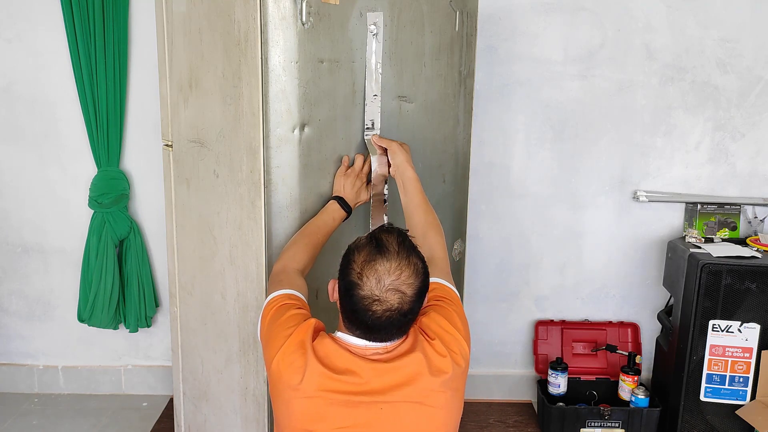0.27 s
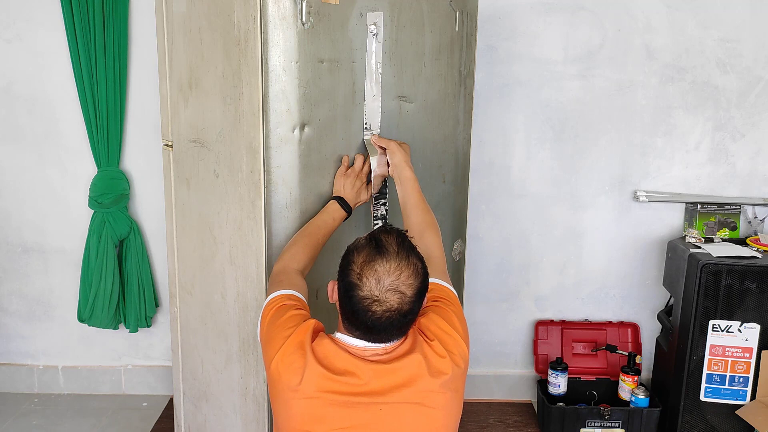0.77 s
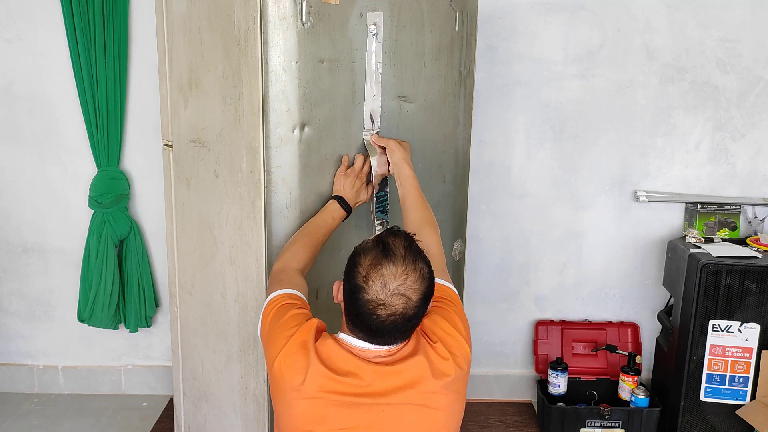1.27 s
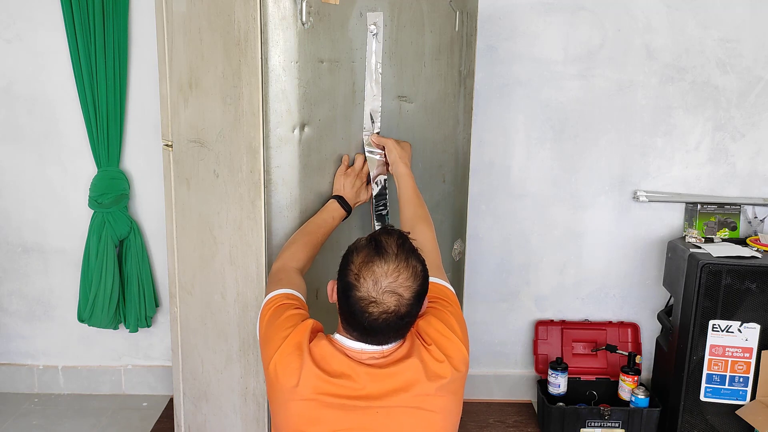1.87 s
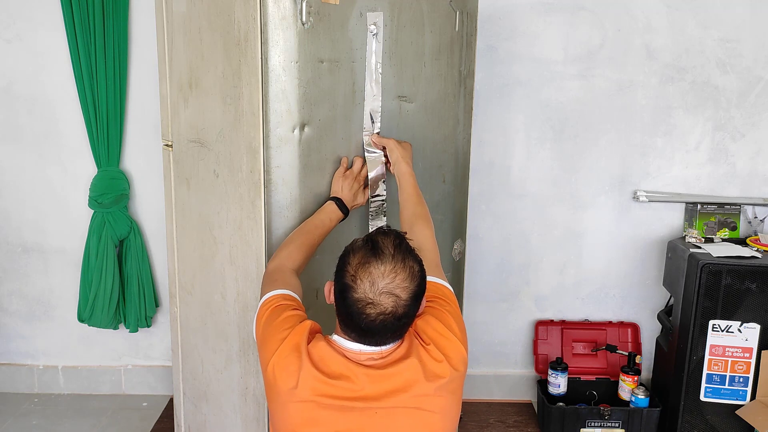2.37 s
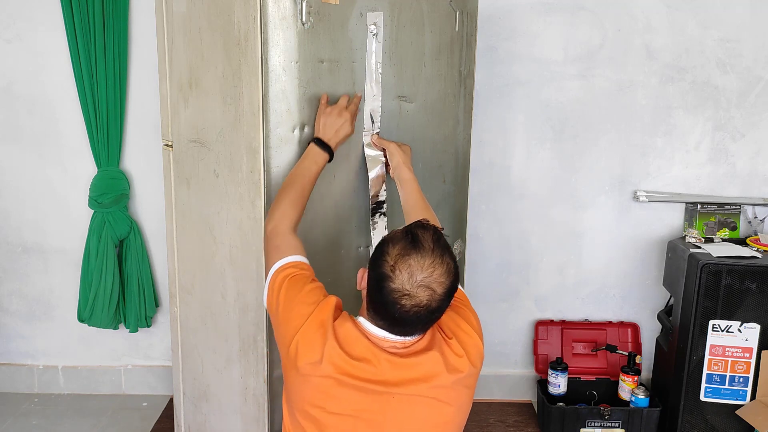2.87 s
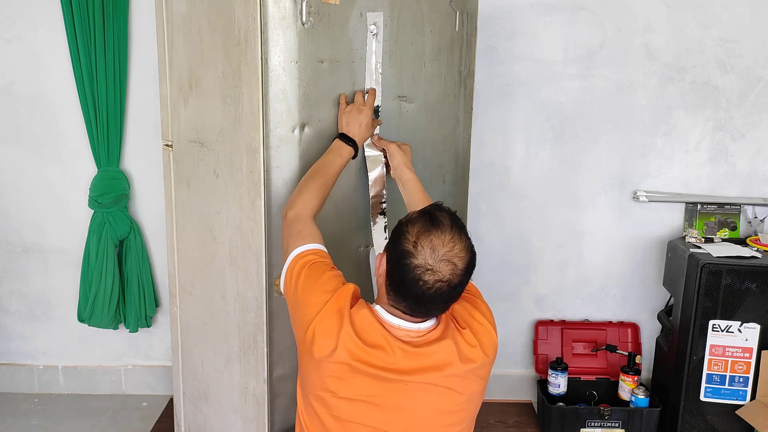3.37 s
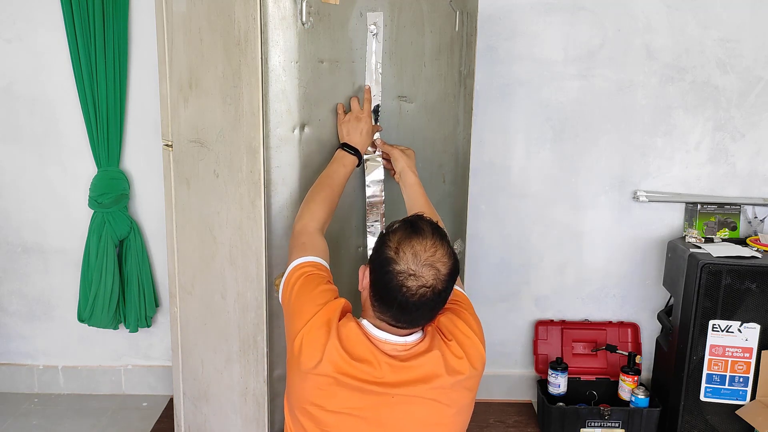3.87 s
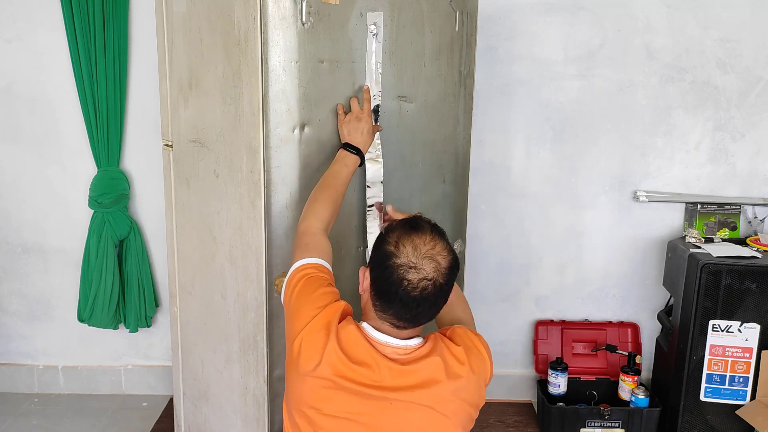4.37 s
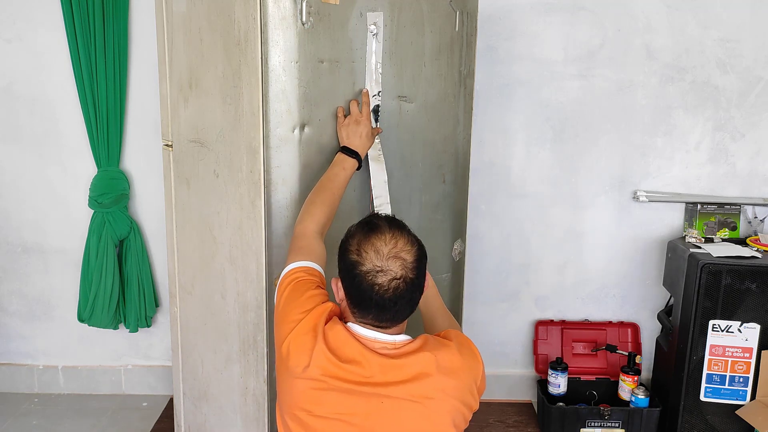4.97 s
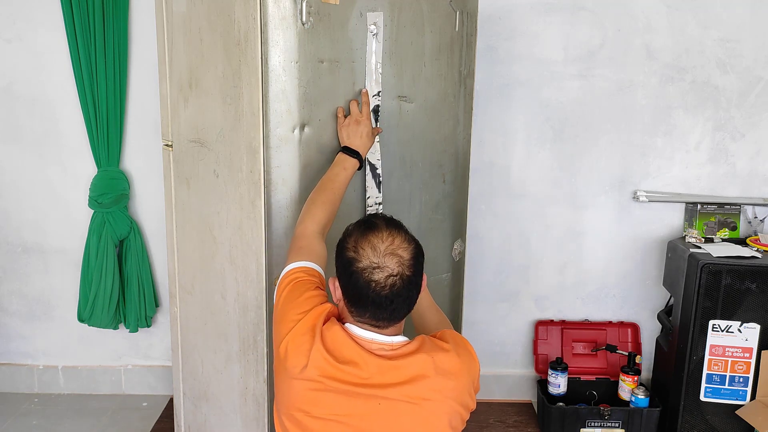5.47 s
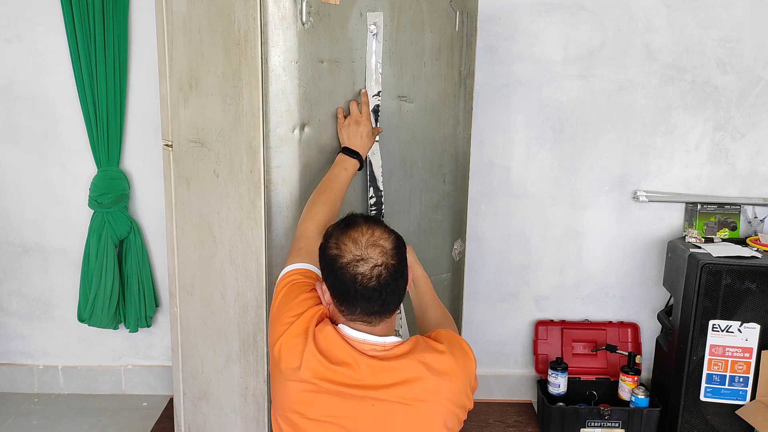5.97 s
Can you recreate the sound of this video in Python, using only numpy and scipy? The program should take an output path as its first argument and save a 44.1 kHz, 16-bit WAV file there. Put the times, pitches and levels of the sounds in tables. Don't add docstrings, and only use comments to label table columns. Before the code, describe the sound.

In a bare, hard-walled room, a hand presses foil tape onto a hollow metal panel a few metres from the microphone. Crisp single snaps come in loose clusters, some with dull panel knocks, and one push makes the metal boom softly. The strongest cracks come just after four seconds, then tugs on the loose strip rustle quietly. A low engine hum from outside swells and fades beneath faint room air.

```python
import sys
import numpy as np
from scipy import signal
from scipy.fft import rfft, irfft
from scipy.io import wavfile
from scipy.ndimage import uniform_filter1d

SR = 44100
rng = np.random.default_rng(int(sys.argv[2]) if len(sys.argv) > 2 else 0)


def to_wav(s):
    ch = np.atleast_2d(s).T
    pcm = np.round(np.clip(ch, -1, 1) * 32767)
    wavfile.write(sys.argv[1], SR, pcm.astype(np.int16))


def invert_db(x):
    u = np.asarray(x, float) / 20
    return 10 ** u


N = 274302

# start_s, level_db, pitch_hz, rustle_s
TUGS = [(4.788, -53, 1960, 0.082), (4.942, -52.5, 2900, 0.066), (4.963, -48, 2100, 0.065),
        (5.0616, -45, 2470, 0.13), (5.064, -60, 4130, 0.049), (5.072, -47.5, 1540, 0.048),
        (5.3451, -45.5, 1540, 0.17), (5.348, -52.5, 3540, 0.043), (5.412, -54, 3000, 0.035),
        (5.405, -50, 1560, 0.037), (5.599, -49, 2800, 0.067), (5.667, -42, 2070, 0.06),
        (5.669, -47, 4060, 0.047), (5.793, -43.5, 1930, 0.065), (5.8244, -47, 1380, 0.13),
        (5.826, -49, 3500, 0.046), (5.798, -51.5, 3370, 0.043), (6.002, -47.5, 1520, 0.09),
        (6.035, -49, 3616, 0.074)]


def evened(x):
    return x / np.sqrt(np.mean(x ** 2) + 1e-20)


def read(points, hz):
    f, value = np.transpose(points)
    return np.interp(np.log(hz + 1), np.log(f + 1), value)


def add(mix, start_s, sound):
    part = mix[round(start_s * SR):][:len(sound)]
    part += sound[:len(part)]


def click(points, tilt_db=0, size=1024):
    hz = abs(np.fft.fftfreq(size, 1 / SR))
    octaves = np.log2(np.clip(hz / 1500, 1, 4.6))
    log_gain = np.log(invert_db(read(points, hz) + tilt_db * octaves))
    pulse = np.fft.ifft(np.exp(np.conj(signal.hilbert(log_gain)))).real[:size // 2]
    return pulse / np.linalg.norm(pulse)


def ring(modes, seconds):
    t = np.arange(round(seconds * SR)) / SR
    return sum(invert_db(db - 60 * t / t60_s) * np.sin(2 * np.pi * hz * t) for hz, db, t60_s in modes)


def drift(hz):
    lowpass = 1 + (np.fft.rfftfreq(N, 1 / SR) / hz) ** 4
    return evened(irfft(rfft(rng.standard_normal(N)) / lowpass, N))


def room_tone():
    # hz, level_db
    air = [(12, -62), (20, 0), (84, -11), (147, -15.5), (263, -17), (387, -21.5), (484, -21), (774, -26),
           (841, -28), (1020, -25), (6010, -38.5), (9370, -45.5), (11700, -41.5), (13800, -40),
           (15000, -56)]
    air_db = -58
    # hz, width_hz, level_db
    murmurs = [(37, 3.4, -73), (173, 12, -77), (249, 50, -68.5), (294, 27, -95), (467, 61, -83),
               (852, 12.7, -77)]
    # hz, correlation
    likeness = [(60, 0.063), (180, 0.71), (550, 0.25), (1650, -0.26), (4970, 0.082), (15000, -0.064)]
    # time_s, level_db
    street = [(0, 4), (.8, 2), (1.4, 1), (2.4, 6), (2.8, 3.5), (3.3, 2), (3.9, 5.5), (4.6, 2.5), (5.4, 3.5),
              (6.22, 2)]
    frames, hz = N // 1024 + 10, np.fft.rfftfreq(4096, 1 / SR)
    a, b, c, d, patches = rng.standard_normal((frames, len(hz), 5)).T
    patches = uniform_filter1d(patches, size=40, axis=0)
    patches = evened(uniform_filter1d(patches, size=6, axis=1))
    swell_db = np.interp((np.arange(frames) - 4) * 1024 / SR, *np.transpose(street))
    same = np.clip(read(likeness, hz), -1, 1)[:, None]
    left = a + 1j * b
    right = same * left + np.sqrt(1 - same ** 2) * (c + 1j * d)
    wide = invert_db(read(air, hz))
    wide *= invert_db(air_db) / np.linalg.norm(wide)
    bands = sum(invert_db(db) / np.sqrt(w) / (1 + ((hz - f) / w * 2) ** 2) for f, w, db in murmurs)
    z = np.array([left, right]) * np.hypot(wide, 3 * bands)[:, None] * invert_db(1.1 * patches + swell_db)
    return signal.istft(z, nperseg=4096, noverlap=3072)[1][:, 4096:N + 4096]


def buffet():
    return invert_db(-53.0) * np.array([drift(18) for port in range(2)])


def tone(hz, level, waver_rad):
    phase = 2 * np.pi * np.cumsum(hz * np.ones(N)) / SR
    return np.sqrt(2) * level * np.sin(phase + waver_rad * drift(8.7))


def far_engine():
    # start_s, length_s, pitch_hz, level_db
    notes_heard = [
        (0.545, 0.4, 101.5, -68),
        (0.912, 0.68, 101.5, -62.5),
        (1.493, 1.7, 108.3, -65.5),
        (2.757, 0.68, 100.5, -63.5),
    ]
    t = np.arange(N) / SR
    out = np.zeros(N)
    for start_s, length_s, hz, db in notes_heard:
        arch = np.sin(np.pi * np.clip((t - start_s) / length_s, 0, 1)) ** 0.31
        out += tone(hz, invert_db(db) * arch, .95)
    return out


def hum():
    # time_s, level_db
    swell = [(0.0, -66), (0.1, -58), (1.52, -55), (1.61, -53), (1.82, -68), (1.87, -52), (2.16, -56.5),
             (2.23, -65), (2.48, -54.5), (2.86, -51), (3.01, -66.5), (3.22, -49.5), (3.72, -48.5),
             (4.9, -61), (5.54, -60), (5.65, -75), (5.75, -64.5), (6.22, -60)]
    from_hz, to_hz, climb_s, climb_time_s = 65.2, 71.5, 1.7, 0.29
    throb_hz, throb_top_s, throb_db, waver_db = 3.05, 1.283, 2.5, 1.94
    t = np.arange(N) / SR
    climbed = 1 / (1 + np.exp((climb_s - t) / climb_time_s))
    throb = throb_db * (1 - climbed) * np.cos(2 * np.pi * throb_hz * (t - throb_top_s))
    level = invert_db(np.interp(t, *np.transpose(swell)) + throb + waver_db * drift(2.3))
    return tone(from_hz + (to_hz - from_hz) * climbed, level, 0.37)


def room(wet_db, gap_s, build_s):
    # time_s, level_db
    echoes = [(.0024, -9), (.0046, -9), (.012, -7), (.0135, -10), (.0175, -9), (.021, -10), (.028, -9)]
    # hz, t60_s
    reverb = [(150, 0.51), (400, 1), (1000, 0.88), (2500, 0.88), (5000, 0.87), (8000, 0.66), (13000, 0.21)]
    s = np.arange(SR) / SR
    density = np.clip((s / .09) ** 2, .03, 1)
    taps = rng.standard_normal((2, SR)) * (rng.random((2, SR)) < density) / np.sqrt(density)
    hz, t, z = signal.stft(taps, SR, nperseg=256)
    t60_s = read(reverb, hz)[:, None]
    tail = signal.istft(z * invert_db(-60 * t / t60_s) / np.sqrt(t60_s), SR, nperseg=256)[1][:, :SR]
    tail = tail * (.5 + .5 / (1 + np.exp((gap_s - s) / build_s)))
    low = signal.sosfiltfilt(signal.butter(1, 700, fs=SR, output="sos"), tail)
    tail = invert_db(wet_db) * (tail - low + low[0]) / np.linalg.norm(tail[0])
    early = np.zeros((2, SR))
    early[:, 0] = 1
    for echo_s, db in echoes:
        early[[0, 1], round(echo_s * SR) + rng.integers(-12, 12, 2)] += invert_db(db) * rng.choice([-1, 1])
    return tail + signal.sosfilt(signal.butter(1, 900, "high", fs=SR, output="sos"), early)


def boom():
    # hz, level_db, t60_s
    modes = [(36.1, 1.5, 3.7), (95.4, -6, 2), (120.5, -8.5, 1.8), (138.6, -10, 1.4), (186, -17.5, 4.1),
             (192.6, -2, 0.23), (266, -15, 0.9), (318.4, -19, 1.5)]
    start_s, level_db, rise_s, stop_s, stop_time_s = 3.49, -41.5, 0.014, 0.55, 0.04
    sound, out = ring(modes, 1.2), np.zeros(N)
    t = np.arange(len(sound)) / SR
    shape = (1 - np.exp(-t / rise_s)) / (1 + np.exp((t - stop_s) / stop_time_s))
    add(out, start_s, invert_db(level_db) * sound * shape)
    return out


def knocks():
    # start_s, thud_db, upper_db
    pushes = [
        (.033, -69, -41),
        (1.53, -55, -68),
        (1.77, -31, -42),
        (1.963, -57, -39),
        (2.183, -38.5, -40.5),
        (3.497, -37.5, -35),
        (4.118, -33.5, -31),
        (4.191, -39.5, -42),
        (4.24, -43, -36.5),
    ]
    # hz, level_db, t60_s
    thud_modes = [(180, 0, .25), (232, 0, .25), (250, -3, .2), (272, -2, .2)]
    # hz, level_db, t60_s
    upper_modes = [(474, -3, 0.063), (400.7, -15, 0.14), (539, -14.5, 0.095), (683, -14.5, 0.11),
                   (802, -5.5, 0.027)]
    out, thud, upper = np.zeros(N), ring(thud_modes, .3), ring(upper_modes, .3)
    thud /= np.linalg.norm(thud)
    upper /= np.linalg.norm(upper)
    pad = 1 - np.exp(-np.arange(len(thud)) / SR / 0.0036)
    for start_s, thud_db, upper_db in pushes:
        add(out, start_s, pad * (invert_db(thud_db) * thud + invert_db(upper_db) * upper))
    return out


def rustle():
    # hz, level_db
    colour = [(180, -37), (300, 4.5), (427, 1.5), (527, 6.5), (910, 1), (2100, -1.5), (3930, -11),
              (8920, -52), (14000, -47)]
    level_db, fade_db, rise_s, grains_per_s = -14.5, -11, 0.0059, 110
    sizes = invert_db(4.6 * np.minimum(rng.exponential(1, N), 4))
    grains = sizes * (rng.random(N) < grains_per_s / SR) * rng.choice([-1, 1], N)
    level, t = np.zeros(N), np.arange(SR) / SR
    for start_s, db, _, length_s in TUGS:
        fade = invert_db(db + level_db + fade_db * t / max(length_s, .02))
        add(level, start_s, np.minimum(t / rise_s, 1) * fade)
    return level * evened(signal.oaconvolve(grains, click(colour))[:N])


def crease(db, hz, ring_ms):
    ms = np.arange(1500) / SR * 1000
    sound = ms * np.exp(-ms / max(ring_ms, .05)) * np.sin(2 * np.pi * hz * ms / 1000)
    return invert_db(db) * sound / np.linalg.norm(sound)


def crack(db, tilt_db):
    # hz, level_db
    colour = [(300, -9), (800, -9), (1500, -5), (4000, 2.5), (7000, -0.5), (8200, -6.5), (9500, -13.5),
              (13000, -12), (14500, -7.5)]
    step_ms, step_ms_per_db, small_db = .5, .19, -44
    spread_ms = step_ms + step_ms_per_db * max(db - small_db, 0)
    late_ms = np.repeat(rng.random(57) ** 2, 9) * spread_ms
    run = irfft(np.exp(-2j * np.pi * np.cumsum(late_ms / 1000) * SR / 1024))[:400]
    sound = np.convolve(click(colour, tilt_db), run)
    return invert_db(db) * sound / np.linalg.norm(sound)


def tugs():
    ring_ms, crack_db, tilt_db = 0.33, -2, -8.5
    slips_per_s, slip_fade_s = 350, .014
    out, t = np.zeros((3, N)), np.arange(2000) / SR
    for k, (start_s, db, hz, _) in enumerate(TUGS):
        chance, size = rng.random((2, len(t)))
        slips = (chance < slips_per_s / SR) * (.4 + .6 * size) * np.exp(-t / slip_fade_s)
        slips[0] = 1.7
        slips /= np.linalg.norm(slips)
        add(out[k % 3], start_s, np.convolve(slips, crease(db, hz, ring_ms)))
        add(out[k % 3], start_s, np.convolve(slips, crack(db + crack_db, tilt_db)))
    return out


def creases():
    # start_s, level_db, pitch_hz, ring_ms
    rings = [(.002, -43, 2470, .94), (.0318, -27.5, 2330, 0.26), (.034, -32.5, 1210, 0.37),
             (.1685, -32, 3370, .8), (.182, -37.5, 3350, 1.1), (.6908, -39.5, 2860, 0.13),
             (1.5273, -34, 2770, 0.14), (1.531, -42, 2500, .9), (1.7695, -31.5, 3460, 0.17),
             (1.8104, -27.5, 2680, 0.063), (1.9383, -34, 2190, 0.19), (1.9613, -34, 2280, 0.49),
             (2.05, -43.5, 2260, .9), (2.1818, -46, 7100, 0.37), (2.184, -34, 2320, 0.85),
             (2.4976, -47, 3200, 0.19), (3.497, -32.5, 3540, 0.24), (3.7614, -34, 2690, 0.32),
             (4.1175, -25.5, 3320, 0.15), (4.1939, -28, 2400, 0.36), (4.229, -36.5, 1620, 0.39)]
    out = np.zeros((3, N))
    for k, (start_s, *row) in enumerate(rings):
        add(out[(k + 1) % 3], start_s, crease(*row))
    return out


def cracks():
    # start_s, level_db, tilt_db_per_octave
    buckles = [(.002, -42, -11), (.0318, -25.5, -0.5), (.1685, -27.5, -4.5), (.6908, -52, 12),
               (1.4035, -46, 1), (1.5273, -36.5, -6.5), (1.7693, -27, -6), (1.8104, -26.5, 12),
               (1.9613, -36, -9), (1.975, -37, -2), (2.1818, -28, 25), (2.183, -27.5, -7.5), (2.74, -57, 7),
               (3.488, -48.5, -6), (3.497, -31, -5.5), (3.7614, -38, 2), (3.93, -44.5, -5),
               (4.1175, -24.5, 5), (4.128, -26.5, -9), (4.141, -29, -7), (4.1939, -28.5, 10)]
    out = np.zeros((3, N))
    for k, (start_s, *row) in enumerate(buckles):
        add(out[k % 3], start_s, crack(*row))
    return out


def scene():
    pushes, rings = knocks() * invert_db(8.0), creases() * invert_db(8.5)
    foil = (cracks() + tugs()) * invert_db(7.5) + rings + pushes
    foil[0] += rustle() * invert_db(-8)
    heard = np.zeros((2, N))
    for part in foil:
        heard += signal.fftconvolve(part[None], room(8.55, 0.0065, 0.0022), axes=1)[:, :N]
    heard = heard + rings.sum(axis=0) * invert_db(-13)
    low = boom() + hum() + far_engine() + pushes * invert_db(-8)
    return heard + low * invert_db([[-.2], [.2]]) + room_tone() + buffet()


def low_pass(x):
    return signal.sosfilt(signal.butter(12, 15600, fs=SR, output="sos"), x)


def record(dry):
    # hz, left_minus_right_db
    port_lean = [(60, -.3), (500, -.6), (1200, -1.3), (3300, -2), (5500, -3), (9000, 4), (12500, -1.5)]
    edge_hz = 14300
    hz = np.fft.rfftfreq(N, 1 / SR)
    lean_db = read(port_lean, hz) / 2
    edge = 1 / (1 + (hz / edge_hz) ** 120)
    mix = irfft(rfft(dry) * invert_db([lean_db, -lean_db]) * edge, N)
    return low_pass(mix)


dry = scene()
out = record(dry)
to_wav(out)
```